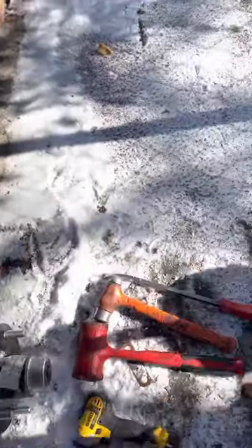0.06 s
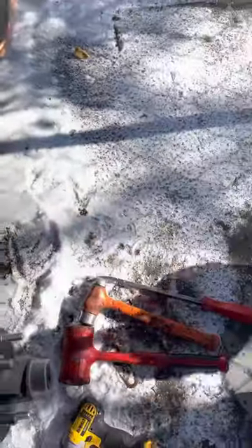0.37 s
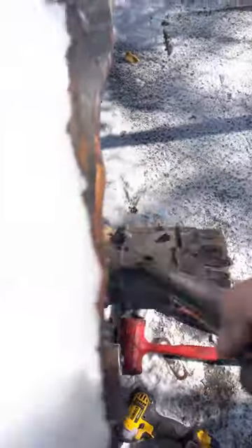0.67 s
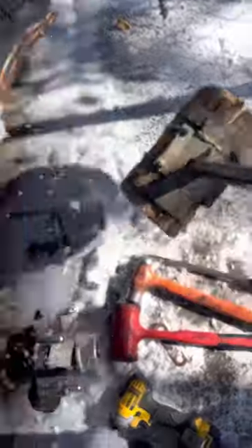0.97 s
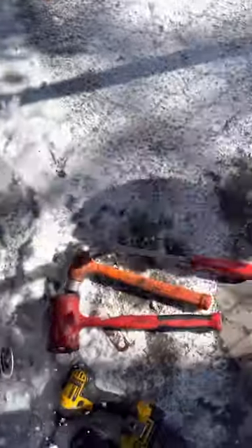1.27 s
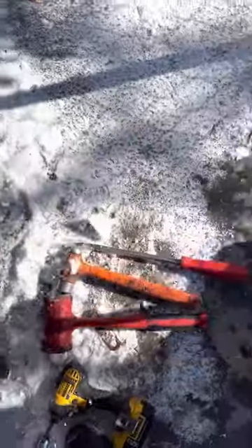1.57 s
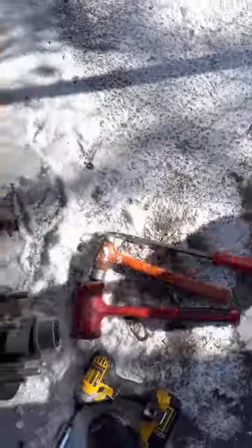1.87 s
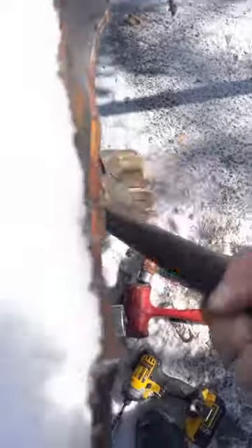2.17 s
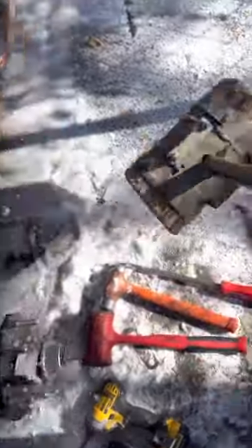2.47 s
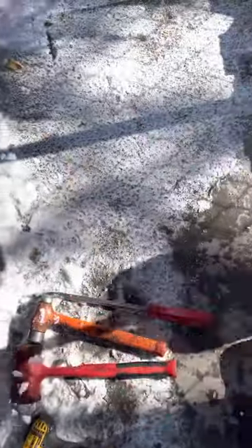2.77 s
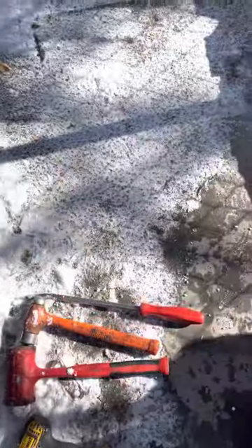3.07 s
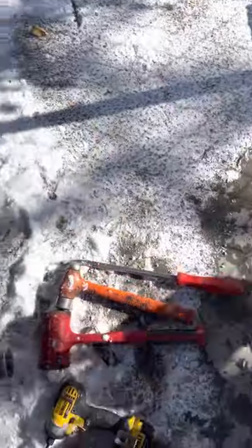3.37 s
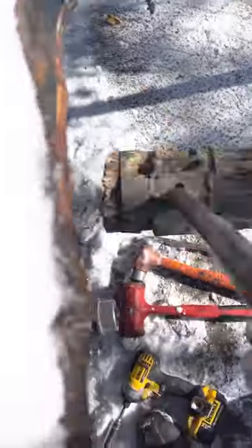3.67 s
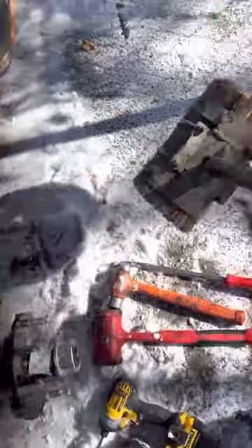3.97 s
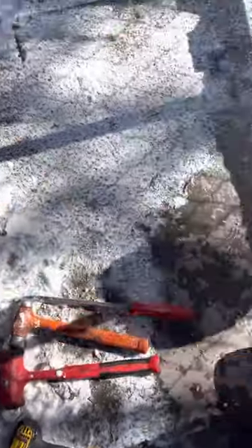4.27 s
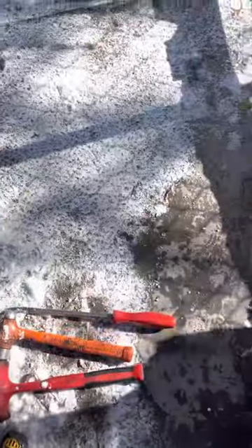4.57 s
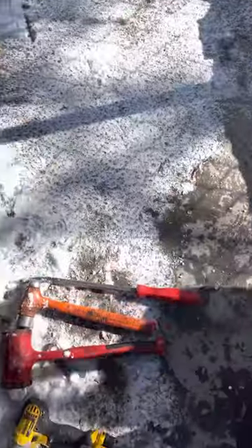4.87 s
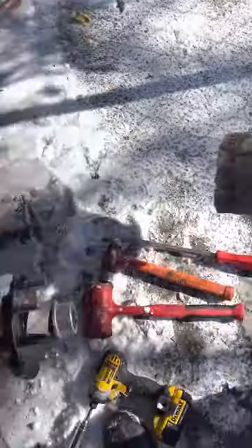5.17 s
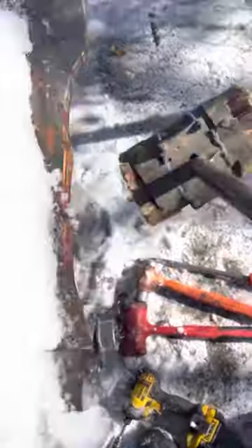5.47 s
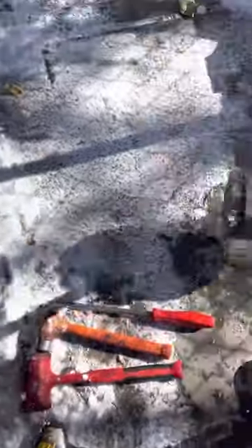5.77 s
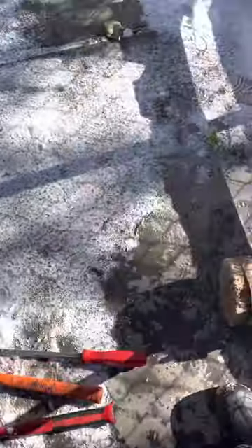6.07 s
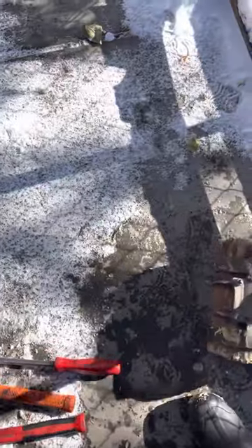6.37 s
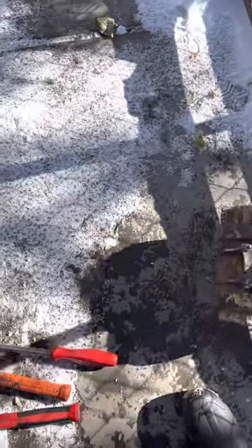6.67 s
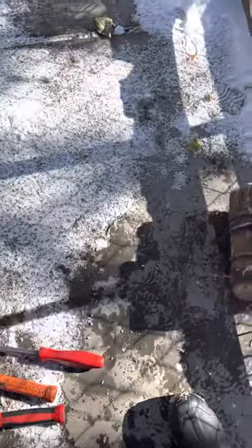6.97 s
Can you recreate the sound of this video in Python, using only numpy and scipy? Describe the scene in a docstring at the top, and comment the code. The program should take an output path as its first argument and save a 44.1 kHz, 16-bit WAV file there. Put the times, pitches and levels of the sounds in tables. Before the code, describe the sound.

A heavy wooden maul strikes a steel trailer suspension four times with booming, ringing blows, then is set down, over a distant engine hum.

```python
"""A heavy, steel-banded wooden maul strikes a trailer's suspension four times, outdoors on snow.
Each blow cracks, sets the frame's modes booming, rattles loose parts and leaves a thin steel ring.
The maul is then put down with wooden knocks and a scrape over gritty ground.
Clothes rustle with the swings; icy snow snaps and a boot skids.
Under a soft rush, a distant engine hums through its resonances and slowly loses speed."""
import sys
import numpy as np
from scipy import signal
from scipy.fft import rfft, irfft, next_fast_len
from scipy.io import wavfile
from scipy.ndimage import uniform_filter1d, minimum_filter1d, map_coordinates

SR = 44100
rng = np.random.default_rng(int(sys.argv[2]) if len(sys.argv) > 2 else 0)


def to_wav(sig):
    """Store sig (one row per channel, or 1-D mono) as 16-bit WAV at the path in sys.argv[1].

    Samples outside -1..1 are clipped; the rate is SR.
    """
    pcm = np.clip(np.atleast_2d(sig), -1, 1) * 32767
    pcm = np.round(pcm).astype(np.int16)
    wavfile.write(sys.argv[1], SR, pcm.T)  # frames by channels


N = 317520

# maul blows: (time [s], crack [dB], head mode [Hz], head [dB], boom [dB], clang [dB], shudder [dB],
# long ring [dB], short ring [dB], clothes [dB])
BLOWS = [(0.701, -12.5, 1734, -6, 5.5, -6.5, -15.5, -41, -62, -56.5),
         (2.1652, -8, 1890, -1, 1.5, -5, -20, -28, -54, -56.5),
         (3.7201, -9, 1820, -2, 2.5, -6.5, -25, -34, -32, -62),
         (5.2790, -7.5, 1670, -10, 4.5, -5.5, -26, -32, -30.5, -67)]
# impact spectrum: (frequency [Hz], density [dB])
CRACK_SPECTRUM = [(150, -7.5), (450, 5), (1000, -9.5), (2200, -1), (3000, -10.5), (5000, -13), (6500, -6),
                  (10000, -15), (11500, -12), (12300, -28), (15000, -49)]
# low modes of the trailer frame: (frequency [Hz], level [dB], t60 [s])
FRAME_MODES = [(72, -27, .4), (102, -21, .35), (155, -13, .24), (198, -16, .28), (226, -16, .34),
               (252, -8.5, .28), (293, -13, .3), (356, -35, .7), (388, -25, .26), (451, -22, .26),
               (482, -22, .26), (546, -28, .24), (590, -25, .22), (686, -23, .22), (742, -25, .2),
               (975, -25, .17), (1043, -21, .19), (1146, -26, .19), (1353, -28, .17)]
# stereo width: (frequency [Hz], side minus mid [dB])
STEREO_WIDTH = [(60, -28), (200, -18), (700, -7), (1400, -14), (2600, -3), (5000, -2.5), (12000, -28)]


def amp(db):
    """Decibels to gain."""
    return 10 ** (np.asarray(db) / 20)


def unit(x):
    """x at rms 1."""
    return x / np.sqrt(np.mean(x ** 2) + 1e-20)


def along(points, hz):
    """(frequency [Hz], value) points read on a log axis."""
    knots_hz, values = np.transpose(points)
    return np.interp(np.log(hz + 1), np.log(knots_hz + 1), values)


def curve(points):
    """(time [s], value) points read at every sample."""
    return np.interp(np.arange(N) / SR, *np.transpose(points))


def wobble(rate_hz):
    """Smooth random curve through knots at rate_hz."""
    knots = rng.standard_normal(int(N * rate_hz / SR) + 4)
    return map_coordinates(knots, [np.arange(N) * rate_hz / SR])


def filtered(x, response):
    """x through a frequency response."""
    n = x.shape[-1]
    padded = next_fast_len(n + 8192)
    return irfft(rfft(x, padded) * response(np.fft.rfftfreq(padded, 1 / SR)), padded)[..., :n]


def noise(spectrum, size=N):
    """Coloured stereo noise, rms 1: bass centred, mid treble wide."""
    mid, side = filtered(rng.standard_normal((2, size)), lambda hz: amp(along(spectrum, hz)))
    side = filtered(side, lambda hz: amp(along(STEREO_WIDTH, hz)))
    return unit(np.array([mid + side, mid - side]))


def swell(t, rise_s):
    """Smooth onset."""
    return 1 - np.exp(-(t / rise_s) ** 2)


def fade(t, t60_s):
    """Free decay, 60 dB in t60_s."""
    return np.exp(-np.log(1000) * t / t60_s)


def hump(centre_s, half_s, order=2):
    """Rise and fall; higher order, flatter top."""
    return np.exp(-np.abs((np.arange(N) / SR - centre_s) / half_s) ** order)


def ring(modes, t):
    """Damped modes at scattered levels, spread in stereo by a phase skew."""
    out = np.zeros((2, len(t)))
    for hz, db, t60_s in modes:
        scatter_db, phase = rng.standard_normal(), rng.uniform(0, 2 * np.pi)
        skew = np.arctan(amp(along(STEREO_WIDTH, hz))) * rng.choice([-1, 1]) * np.array([[1], [-1]])
        out += amp(db + scatter_db) * fade(t, t60_s) * np.sin(2 * np.pi * hz * t + phase + skew)
    return out


def add(track, at_s, sound):
    """Mix a sound in at at_s."""
    start = max(round(at_s * SR), 0)
    part = track[:, start:start + sound.shape[-1]]
    part += sound[..., :part.shape[-1]]


def engine():
    """A far engine's crank orders swell as they cross its resonances, over rumble and a steady hum."""
    # holds, picks up a little, runs down: (time [s], crank speed [Hz])
    crank_speed = [(0, 34.3), (.8, 33.2), (1.9, 33.6), (2.9, 35.9), (3.45, 35.7), (4.95, 32), (5.65, 29),
                   (7.2, 26.1)]
    # how strongly it carries: (time [s], level [dB])
    carry = [(0, -4), (1.2, 1.5), (2.0, 1.5), (3.4, 0.5), (4.3, -7), (5.0, 0), (6.1, -1.5), (7.2, -1)]
    # crank orders: (multiple, level [dB])
    orders = [(2, -1), (3, 0), (4, 0.5), (5, -2), (6, -14)]
    # exhaust resonances: (frequency [Hz], half width [Hz], level [dB])
    exhaust = [(51, 7, -27.5), (69, 7, -28.5), (84, 7, -27.5), (101, 10, -43), (131, 10, -37),
               (161, 13, -32.5), (186, 12, -43), (214, 10, -44)]
    # rumble: (frequency [Hz], density [dB])
    rumble_spectrum = [(20, -24.5), (40, 6), (60, -2.5), (110, 5.5), (170, 2), (230, -9.5), (400, -46.5),
                       (10500, -49.5), (13000, -80)]
    hum_hz, hum_db, rumble_db = 121, -44.5, -44
    speed_hz, level_db = curve(crank_speed), curve(carry)
    crank_rad = 2 * np.pi * np.cumsum(speed_hz * (1 + .002 * wobble(12))) / SR
    tones = np.zeros(N)
    for k, order_db in orders:
        gain = sum(amp(db) / (1 + ((k * speed_hz - hz) / half_hz) ** 2) ** 2
                   for hz, half_hz, db in exhaust)
        gain *= amp(order_db + 1.2 * wobble(9.3))
        tones += gain * np.sin(round(k) * crank_rad + rng.uniform(0, 2 * np.pi))
    hum = amp(hum_db + 1.4 * wobble(1.0)) * np.sin(2 * np.pi * hum_hz * np.arange(N) / SR)
    rumble = amp(rumble_db + 0.86 * level_db + 1.5 * wobble(4)) * noise(rumble_spectrum)
    return amp(level_db) * tones + hum + rumble


def air():
    """Soft rush of the surroundings."""
    # rush: (frequency [Hz], density [dB])
    spectrum = [(120, -28), (200, 1), (349, -2.5), (554, 0), (1260, -9.5), (2800, -26.5), (3480, -32),
                (4960, -38.5), (8000, -43), (10400, -61), (17600, -120)]
    # its slow drift: (time [s], mid-band level [dB])
    drift = [(0.0, -52), (1.02, -49), (3.81, -51.5), (3.97, -55.5), (6.72, -58.5), (7.2, -55.5)]
    return amp(curve(drift) + 3 + 0.39 * wobble(5.7)) * noise(spectrum)


def movement():
    """Worker's effort: the arms come round just before each blow, the body turns all through it."""
    # shifting about: (time [s], half length [s], level [dB])
    shifts = [(0.001, 0.13, -39.5), (6.075, 0.058, -51), (6.718, 0.41, -68), (7.138, 0.18, -60.5)]
    effort = sum(amp(db) * hump(at_s, half_s) for at_s, half_s, db in shifts)
    for at_s, *_, db in BLOWS:
        arms = hump(at_s - 0.079, half_s=0.17)
        turn = amp(-5.5) * hump(at_s + 0.044, half_s=0.68, order=6)
        effort += amp(db) * (arms + turn)
    return effort


def folds(x, depth_db=3):
    """Cloth folds favour changing bands: random gain patches of about 700 Hz by 100 ms."""
    bins = signal.stft(x, nperseg=512)[2]
    patches = uniform_filter1d(rng.standard_normal(bins.shape[1:]), size=8, axis=0)
    patches = uniform_filter1d(patches, size=18, axis=1)
    return signal.istft(bins * amp(depth_db * unit(patches)), nperseg=512)[1][:, :N]


def rustle():
    """Clothes and snow hiss with every movement, with a fine, gritty crackle."""
    # cloth friction: (frequency [Hz], density [dB])
    spectrum = [(600, -16), (2000, 2), (3500, -8), (5000, -9), (7000, -5), (10000, -13), (11600, -10),
                (12500, -22), (15500, -31.5)]
    grains_per_s, grain_db, spread_db = 35, -6.5, 3.5
    effort = movement()
    crackle = amp(2 * wobble(40) + 2.2 * wobble(700))
    onsets = rng.random(N) < grains_per_s / SR
    grains = effort * onsets * amp(grain_db + spread_db * rng.standard_normal(N))
    grit = signal.fftconvolve(grains, fade(np.arange(SR // 10) / SR, t60_s=.025))[:N]
    return (effort + grit) * unit(folds(noise(spectrum)) * crackle)


def knocks():
    """Wood knocks: tap, modal clack, dull thud and steel clink; longer taps start softly."""
    # knocks: (time [s], wood [dB], thud [dB], tap t60 [s], clink [dB])
    hits = [(.04, -43, -39, 0.14, -48), (0.199, -35, -90, 0.036, -60), (4.589, -46, -81, 0.049, -67),
            (5.8791, -7.5, -22.5, 0.015, -42), (5.931, -19.5, -41, 0.058, -36),
            (6.066, -31.5, -43.5, 0.056, -38), (6.105, -39, -48, 0.075, -40),
            (6.135, -39.5, -79, 0.13, -38.5), (6.8760, -20.5, -27, 0.024, -36),
            (6.8837, -31, -36.5, 0.047, -49.5), (6.935, -26.5, -32.5, 0.042, -29.5),
            (7.193, -40.5, -45.5, 0.032, -37)]
    # tap: (frequency [Hz], density [dB])
    tap_spectrum = [(200, -33), (500, -7), (1100, 1), (1700, 5.5), (2600, -1), (3400, -11.5), (5000, -13),
                    (7000, -13), (11000, -25.5), (15000, -31)]
    # the wood's own modes: (frequency [Hz], level [dB], t60 [s])
    wood_modes = [(1457, -1.5, .04), (1766, 0, 0.037), (2395, -4.5, 0.027), (2670, 4.5, 0.021),
                  (5900, -13, 0.033)]
    # maul on the ground: (frequency [Hz], level [dB], t60 [s])
    thud_modes = [(195, 4, 0.057), (245, 8.5, 0.05), (334, 11, 0.029), (383.6, -5, 0.32), (503, 9, 0.027),
                  (820, -0.5, 0.064)]
    # a nudged tool: (frequency [Hz], level [dB], t60 [s])
    tool_modes = [(1060, 5, 0.035), (1000, 2, 0.15), (1093, 2.5, .11), (1363, -14.5, 0.12)]
    out, t = np.zeros((2, N)), np.arange(SR // 2) / SR
    for at_s, wood_db, thud_db, t60_s, clink_db in hits:
        decay = fade(t, t60_s) + amp(-21) * fade(t, 0.194)
        tap = amp(-1.5) * noise(tap_spectrum, len(t)) * decay
        clack = amp(-7.5) * ring(wood_modes, t)
        wood = amp(wood_db) * (tap + clack) * swell(t, 0.45 * t60_s ** 2)
        thud = amp(thud_db) * ring(thud_modes, t) * swell(t, 0.0016)
        clink = amp(clink_db) * ring(tool_modes, t) * swell(t, 0.0057)
        add(out, at_s, wood + thud + clink)
    return out


def snaps():
    """Icy snow breaks in single bright snaps."""
    # snaps: (time [s], relative level [dB])
    breaks = [(0.0528, -39), (0.0843, -34.5), (0.118, -33), (0.1382, -32), (0.1483, -34), (0.62, -37),
              (0.9988, -44), (1.1025, -47), (1.737, -48.5), (2.0515, -39), (2.4388, -45.5), (4.8895, -50.5),
              (5.4657, -50.5), (6.747, -48), (6.9425, -36.5)]
    # one snap: (frequency [Hz], density [dB])
    spectrum = [(600, -14), (2000, 0.5), (4500, -5.5), (7000, 2), (11000, 0.5), (15500, -6.5)]
    out, t = np.zeros((2, N)), np.arange(SR // 10) / SR
    for at_s, db in breaks:
        add(out, at_s, amp(db - 3) * noise(spectrum, len(t)) * fade(t, t60_s=.018))
    return out


def lead_in(t, cutoff_hz=5100):
    """A brief, dull noise swells just before each crack and softens its attack."""
    burst = noise(CRACK_SPECTRUM, len(t)) * swell(t, 0.021) * fade(t, 0.061)
    return filtered(burst, lambda hz: 1 / (1 + (hz / cutoff_hz) ** 4))


def contact(t, t60_s):
    """Brief crack of steel on steel."""
    return noise(CRACK_SPECTRUM, len(t)) * swell(t, 0.0012) * fade(t, t60_s)


def clang(t):
    """The frame's dense, weaker modes as noise that decays band by band."""
    # mode crowd: (frequency [Hz], density [dB])
    spectrum = [(30, -21.5), (60, -0.5), (130, 6.5), (300, -2), (500, -10), (1000, -12), (2000, -17.5),
                (3200, -23.5), (5000, -28), (6500, -26), (11000, -35), (12500, -47), (15000, -90)]
    # its decay: (frequency [Hz], t60 [s])
    decay_times = [(60, 0.22), (300, 0.41), (700, 0.3), (1500, 0.25), (4000, 0.18), (11000, 0.26)]
    hz, time_s, bins = signal.stft(noise(spectrum, len(t)), SR, nperseg=512)
    bass = 1 / (1 + (hz[:, None] / 700) ** 2)
    build = 1 - bass * np.exp(-time_s / 0.013)  # slow bending waves fill the frame late
    spot = amp(1.8 * rng.standard_normal((len(hz), 1)) * (2 - bass))  # each spot favours other modes
    decay = fade(time_s, along(decay_times, hz)[:, None])
    return signal.istft(bins * build * spot * decay, SR, nperseg=512)[1][:, :len(t)]


def cluster(modes, t, jitter_s=6e-5):
    """Close modes with wandering phases beat unevenly."""
    return sum(ring([mode], t + jitter_s * wobble(30)[:len(t)]) for mode in modes)


def steel_ring(t, short_db, long_db):
    """A small steel part's wavering ring passes from a short-lived cluster to a lower, lasting one."""
    # short-lived cluster: (frequency [Hz], level [dB], t60 [s])
    short_modes = [(3910, -9, .5), (3540, -10, 0.37), (3994, -1.5, .52), (3810, -3, 0.55),
                   (3940, -5.5, .45), (4085, -3, .32), (4140, 0, 0.26), (4340, -6, 0.4), (10800, -18, 0.41)]
    # lasting cluster: (frequency [Hz], level [dB], t60 [s])
    long_modes = [(3810, 2.5, 1.01), (3804, -0.5, 0.99), (3860, -1.5, 0.74), (3856, -7.5, .8),
                  (3885, -4.5, 0.87), (4030, -4, 0.84), (10800, -7.5, 0.51), (10790, -10, .5)]
    early = amp(short_db) * cluster(short_modes, t)
    late = amp(long_db) * cluster(long_modes, t) * swell(t, rise_s=0.32)
    return (early + late) * amp(3.5 * wobble(12)[:len(t)])


def blows():
    """The maul cracks; the frame booms, clangs, shudders and rings."""
    # trailer shaking on its springs: (frequency [Hz], density [dB])
    shudder_spectrum = [(30, -20), (45, -7.5), (110, -3.5), (230, 4), (320, -3.5), (450, -17.5),
                        (1000, -30), (3000, -40.5), (8000, -53)]
    lead_in_s = 0.013
    out, t = np.zeros((2, N)), np.arange(SR) / SR
    for at_s, crack_db, head_hz, head_db, boom_db, clang_db, shudder_db, long_db, short_db, _ in BLOWS:
        add(out, at_s - lead_in_s, amp(crack_db + 9) * lead_in(t))
        crack = amp(crack_db + 2) * contact(t, t60_s=0.035)
        head_modes = [(head_hz, 0, .035), (1.2 * head_hz, -12, .035)]
        head = amp(head_db) * ring(head_modes, t) * swell(t, 0.0018)
        boom = amp(boom_db + 2.5) * ring(FRAME_MODES, t) * swell(t, 0.034)
        buzz = amp(1.5 * wobble(500)[:SR] * fade(t, .6))  # loose parts against the frame
        frame = amp(clang_db) * clang(t) * swell(t, 0.0039) * buzz
        shudder = amp(shudder_db) * noise(shudder_spectrum, SR) * swell(t, 0.092) * fade(t, 0.99)
        add(out, at_s, crack + head + boom + frame + shudder + steel_ring(t, short_db, long_db))
    return out


def rattles():
    """The head rebounds and the loose suspension knocks back, ringing frame modes near one pitch."""
    # rebounds and knocks: (time [s], crack [dB], favoured pitch [Hz], clunk [dB])
    hits = [(0.7074, -10, 1020, -18), (0.7100, -12.5, 750, -17.5), (0.7300, -22, 158, -4.5),
            (0.7590, -36, 155, -22), (0.7680, -30.5, 740, -17), (2.1700, -16, 1040, -14),
            (2.177, -14.5, 124, -10.5), (2.1885, -15, 196, -4.5), (2.2085, -19.5, 484, -24.5),
            (2.2360, -25.5, 255, -17), (3.7262, -4.5, 1340, -20), (3.7497, -16, 263, -9.5),
            (3.7720, -26, 690, -21), (3.7955, -24.5, 293, -24), (5.2845, -11, 1353, -29),
            (5.3040, -24.5, 254, -11), (5.3260, -21, 686, -35)]
    slope_db_per_octave, t60_share = -27, 0.54  # touching parts damp the modes
    out, t = np.zeros((2, N)), np.arange(SR // 2) / SR
    for at_s, crack_db, favoured_hz, clunk_db in hits:
        modes = [(hz, slope_db_per_octave * abs(np.log2(hz / favoured_hz)), t60_share * t60_s)
                 for hz, _, t60_s in FRAME_MODES]
        crack = amp(crack_db) * contact(t, t60_s=0.012)
        clunk = amp(clunk_db) * ring(modes, t) * swell(t, 0.004)
        add(out, at_s, crack + clunk)
    return out


def sway(rock_hz=45.7):
    """Each shudder passes into a deep rocking of the whole trailer."""
    out, t = np.zeros((2, N)), np.arange(2 * SR) / SR
    rocking = np.sin(2 * np.pi * rock_hz * t) * swell(t, rise_s=.3) * fade(t, t60_s=2.3)
    for at_s, *_, shudder_db, _, _, _ in BLOWS:
        add(out, at_s, amp(shudder_db - 6.5) * rocking)
    return out


def hiss_band(centre_hz, size, half_width_hz=670):
    """Friction noise through one resonance, rms 1."""
    white = noise([(100, 0), (16000, 0)], size)
    return unit(filtered(white, lambda hz: 1 / (1 + ((hz - centre_hz) / half_width_hz) ** 2)))


def swishes():
    """Sleeves slide: each stroke catches quickly, hisses in two resonances and eases off."""
    # strokes: (time [s], length [s], lower resonance [Hz], lower [dB], upper [dB])
    strokes = [(0.927, 0.18, 2820, -59, -82), (1.152, 0.21, 1730, -55, -57), (1.612, 0.16, 3400, -58, -77),
               (1.941, 0.14, 2400, -53, -58), (3.139, 0.24, 3600, -62, -92), (7.069, .3, 2140, -60, -70)]
    upper_ratio = 2.47
    out, t = np.zeros((2, N)), np.arange(SR // 2) / SR
    for at_s, length_s, hz, lower_db, upper_db in strokes:
        stroke = swell(t, .015) * np.exp(-(t / length_s) ** 4)
        lower = amp(lower_db) * hiss_band(hz, len(t))
        upper = amp(upper_db) * hiss_band(upper_ratio * hz, len(t))
        add(out, at_s, stroke * (lower + upper))
    return folds(out) * amp(2 * wobble(50) + 2 * wobble(500) - 3)


def skids():
    """A boot breaks loose on icy snow: an abrupt, grainy hiss that trails off."""
    # slips: (time [s], t60 [s], level [dB])
    slips = [(4.5895, 0.038, -42.5), (4.59, 1.2, -50.5), (4.838, 0.45, -57.5)]
    # sole on snow: (frequency [Hz], density [dB])
    spectrum = [(1000, -10), (2000, -0.5), (2800, -13.5), (3350, 2), (3900, -4.5), (4800, -16.5),
                (5900, -4), (6600, -10), (8700, -4.5), (9150, 3.5), (9600, -9), (11500, -8.5), (13000, -18),
                (15500, -18.5)]
    out, t = np.zeros((2, N)), np.arange(SR) / SR
    for at_s, t60_s, db in slips:
        grain = amp(2.5 * wobble(600)[:SR])
        hiss = unit(noise(spectrum, SR) * grain)
        add(out, at_s, amp(db) * hiss * swell(t, .001) * fade(t, t60_s))
    return out


def scrapes():
    """The maul head drags over gritty ground in short slips that catch at once and die away."""
    # slips: (time [s], t60 [s], level [dB])
    slips = [(6.21, 0.076, -37.5), (6.238, .07, -40), (6.2495, .09, -39.5), (6.262, 0.084, -39),
             (6.306, 0.11, -39.5), (6.327, .07, -48), (6.368, 0.27, -54.5), (6.396, 0.07, -56)]
    # head on grit: (frequency [Hz], density [dB])
    spectrum = [(700, -9.5), (1300, -10), (1650, 10.5), (1950, -4), (2250, 4.5), (2800, -17), (6000, -29),
                (11000, -29.5), (14000, -50)]
    envelope, t = np.zeros(N), np.arange(N) / SR
    for at_s, t60_s, db in slips:
        age_s = np.maximum(t - at_s, 0)
        envelope += amp(db) * swell(age_s, 0.0022) * fade(age_s, t60_s)
    grit = amp(2.5 * wobble(400))
    return envelope * unit(noise(spectrum) * grit)


def limit(x, ceiling_db, hold_s, release_db_per_s):
    """Gain drops at once for a peak, holds, then ramps back."""
    needed_db = np.minimum(ceiling_db - 20 * np.log10(np.abs(x).max(0) + 1e-9), 0)
    half_hold = max(int(hold_s * SR / 2), 1)
    held_db = minimum_filter1d(needed_db, 2 * half_hold + 1, origin=half_hold)
    ramp_db = release_db_per_s * np.arange(N) / SR
    gain_db = np.minimum.accumulate(held_db - ramp_db) + ramp_db
    smooth_db = uniform_filter1d(minimum_filter1d(gain_db, size=129), size=129)
    return x * amp(smooth_db)


def scene():
    """The work close by, its blows slightly right; the engine far off."""
    maul = (blows() + rattles()) * amp([[-.4], [.4]]) + sway() + knocks() + scrapes()
    return maul + swishes() + skids() + snaps() + rustle() + engine() + air()


def record(dry):
    """Right channel leads slightly; peaks are rounded and limited; the top is cut off."""
    clip_level, cutoff_hz = 1.3, 16200
    delay_s = np.array([[1], [-1]]) * 13e-6
    delayed = filtered(dry, lambda hz: np.exp(-2j * np.pi * hz * delay_s))
    rounded = delayed / (1 + np.abs(delayed / clip_level) ** 4) ** (1 / 4)
    limited = limit(rounded, ceiling_db=-.6, hold_s=.05, release_db_per_s=75)
    return filtered(limited, lambda hz: hz < cutoff_hz)


dry = scene()
out = record(dry)
to_wav(out)
```